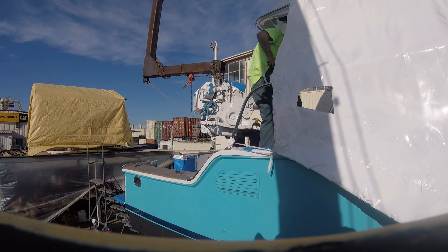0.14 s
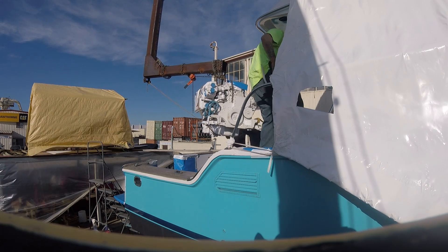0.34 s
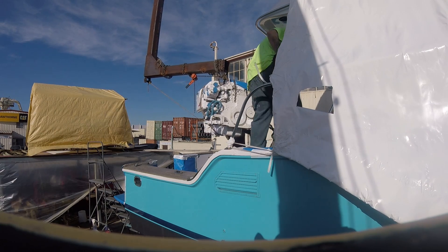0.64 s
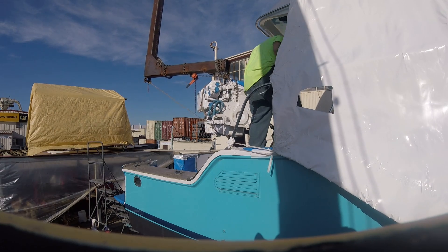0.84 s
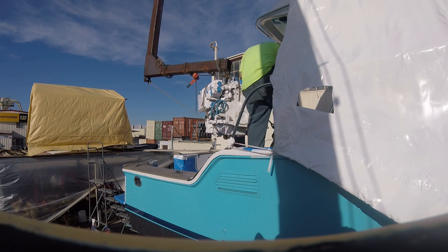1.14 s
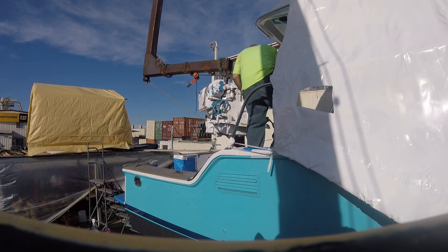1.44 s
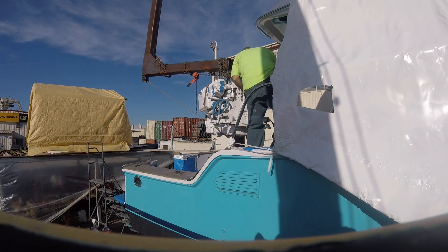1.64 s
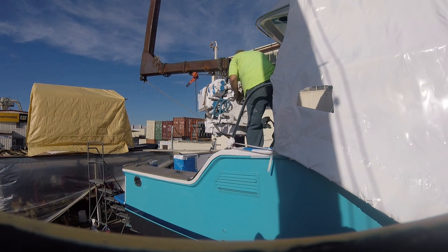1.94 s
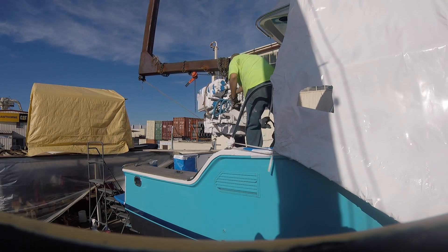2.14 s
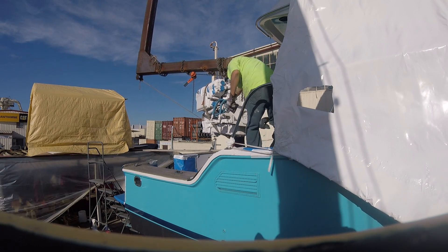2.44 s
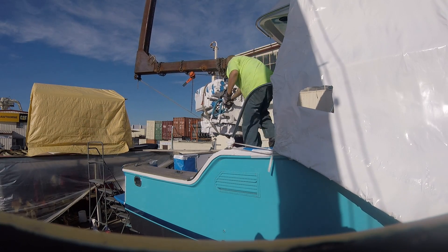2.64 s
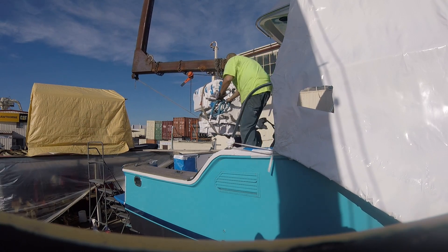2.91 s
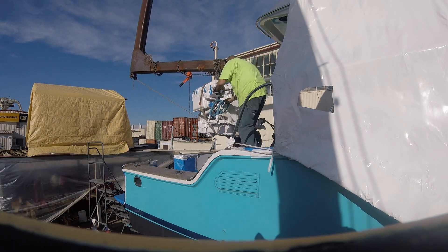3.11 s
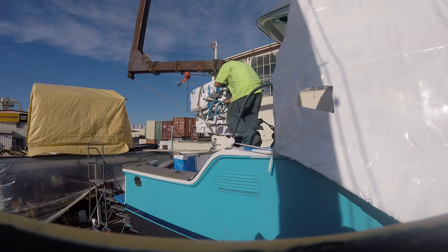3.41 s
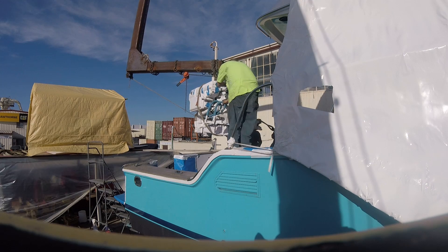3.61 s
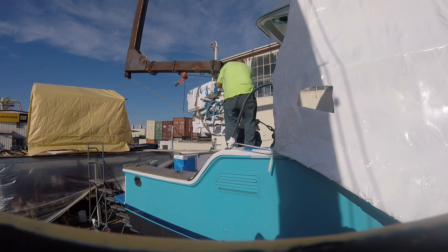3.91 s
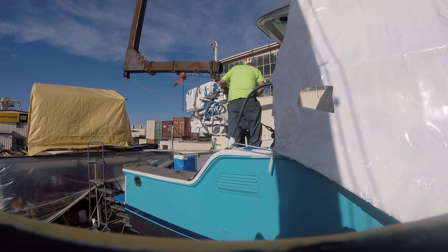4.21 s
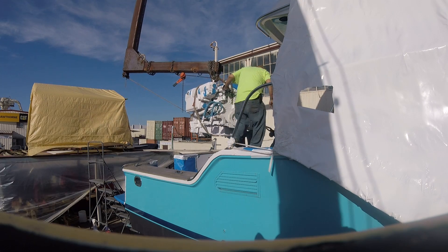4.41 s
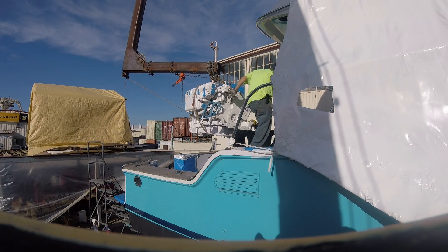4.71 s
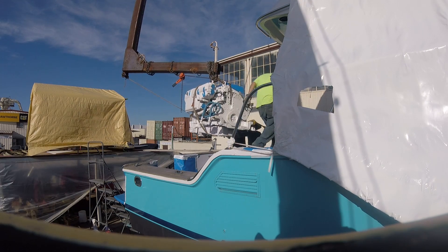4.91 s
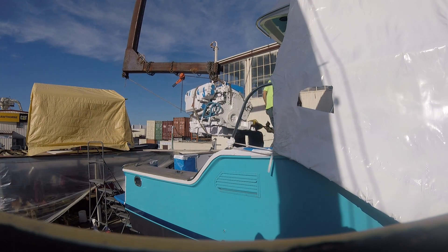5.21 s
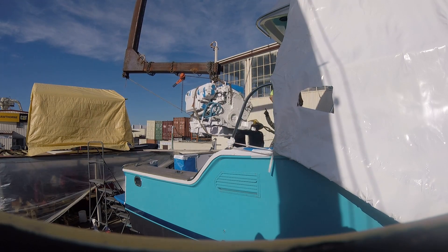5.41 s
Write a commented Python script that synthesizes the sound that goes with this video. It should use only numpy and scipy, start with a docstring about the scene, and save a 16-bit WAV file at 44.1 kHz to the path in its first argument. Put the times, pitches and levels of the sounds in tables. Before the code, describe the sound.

A crane's diesel idles with a low rumble in gusty wind, then a hydraulic hiss and whine joins halfway through.

```python
"""A crane's diesel idles in a boatyard while a marine engine hangs from its hook.
From the start, firing pulses hum in the exhaust over the engine's roar, a fan tone comes and goes,
and gusts buffet the microphone. Early on, chain links tick and a machine hum sags to rest.
Midway a hydraulic valve opens: oil hisses through it and sets the pipework whining.
The whole sound then sinks a little during the strongest gusts, and recovers."""
import sys
import numpy as np
from scipy import signal
from scipy.fft import rfft, irfft
from scipy.io import wavfile
from scipy.ndimage import uniform_filter1d, minimum_filter1d

SR = 44100
rng = np.random.default_rng(int(sys.argv[2]) if len(sys.argv) > 2 else 0)


def log_audio(samples):
    """Write samples as a 16-bit WAV file to the path given in sys.argv[1]."""
    # one column per channel
    frames = np.atleast_2d(samples).T
    # limit to full scale, then quantise
    limited = np.clip(frames, -1, 1)
    pcm = np.round(limited * 32767).astype(np.int16)
    wavfile.write(sys.argv[1], SR, pcm)


N = 244755
TIME = np.arange(N) / SR
FREQS = np.fft.rfftfreq(N, 1 / SR)

# dip and recovery of the whole sound: t/s, gain/dB
OVERALL_DIP = [(3.0, 1), (3.55, -2.5), (3.9, -1), (4.45, -1), (5.2, 1.5)]


def gain_of(db):
    """Amplitude ratio: tenfold for every 20 dB."""
    return 10 ** (np.asarray(db) / 20)


def unit_rms(x):
    """Normalisation to a mean square of one."""
    return x / np.sqrt(np.mean(x ** 2) + 1e-20)


def level_curve(points):
    """Linear interpolation of a level in time."""
    t, db = np.transpose(points)
    return np.interp(TIME, t, db)


def colour(points):
    """Spectral envelope: gain from levels interpolated over log frequency."""
    hz, db = np.transpose(points)
    return gain_of(np.interp(np.log(FREQS + 1), np.log(hz), db))


def passband(half_width_hz, slope, centre_hz=0):
    """Filter gain with power-law skirts; a low-pass when centred on zero."""
    return 1 / (1 + ((FREQS - centre_hz) / half_width_hz) ** slope)


def noise(gain):
    """Spectral shaping of Gaussian noise, at unit rms."""
    real, imag = rng.standard_normal((2, len(FREQS)))
    return unit_rms(irfft((real + 1j * imag) * gain, N))


def drift(hz):
    """Slow random modulation: low-passed noise at unit rms."""
    return noise(passband(hz, 4))


def reflections(reach_s, depth, count=40):
    """Interference of short echoes puts a fixed ripple on a spectrum."""
    taps = np.zeros(N)
    delay, polarity = rng.random((count, 2)).T
    taps[(delay * reach_s * SR).astype(int)] = np.sign(polarity - .5)
    return 1 - depth + depth * unit_rms(abs(rfft(taps)))


def tone(hz, db, waver_hz):
    """Random frequency modulation: a sine wanders a little in pitch."""
    return gain_of(db) * np.sin(2 * np.pi * np.cumsum(hz + waver_hz * drift(10.5)) / SR)


def wind(breeze_db=-28, drop_s=0.069, lump_db=0.56):
    """Turbulent pressure at the microphone: gusts build, drop fast and add to the breeze in power."""
    # turbulence spectrum: f/Hz, relative density/dB
    turbulence = [(15, -23), (35, -1.5), (100, 0), (160, -2), (240, -8.5), (400, -16), (700, -32.5),
                  (1500, -62), (4000, -86.5)]
    # gusts: peak t/s, level/dB, build-up time/s
    gusts = [(.15, -23, 0.42), (1.56, -19.5, .17), (3.379, -12, 0.49), (4.22, -12, 0.6),
             (4.68, -17.5, 0.75), (5.42, -18.5, 0.57)]
    power = gain_of(breeze_db) ** 2
    for t, db, build_s in gusts:
        swell = np.exp(np.minimum((TIME - t) / build_s, (t - TIME) / drop_s))
        power += (gain_of(db) * swell) ** 2
    return np.sqrt(power) * gain_of(-lump_db * drift(14)) * noise(colour(turbulence))


def buffets(low_edge_ratio=0.28):
    """Each eddy striking the microphone is a pressure fluctuation: a short swell of low noise."""
    # eddies: t/s, level/dB, half-length/s, upper edge f/Hz
    eddies = [(1.125, -18.5, 0.037, 350), (1.468, -12, 0.02, 80), (1.532, -15.5, 0.011, 257),
              (2.215, -11.5, 0.036, 110), (3.066, -17, 0.055, 268.3), (3.203, -12.5, 0.014, 278),
              (3.253, -11.5, 0.016, 293), (3.416, -7, 0.015, 230), (3.853, -8.5, 0.0096, 382),
              (4.01, -12.5, 0.0066, 684), (4.06, -13.5, 0.024, 334), (4.237, -11.5, 0.018, 210)]
    out = np.zeros(N)
    for t, db, half_s, edge_hz in eddies:
        band = (1 - passband(low_edge_ratio * edge_hz, 3)) * passband(edge_hz, 5)
        swell = np.exp(-((TIME - t) / half_s) ** 2)
        eddy = swell * noise(band)
        out += gain_of(db) * eddy * np.linalg.norm(swell) / np.linalg.norm(eddy)
    return out


def rigging(level_db=-13, ring_s=0.0054):
    """Damped impacts: chain links shift under the load with faint bright ticks."""
    # link impacts: t/s, relative level/dB
    ticks = [(0.506, -33), (0.5462, -34), (0.8244, -37), (0.9037, -34), (1.073, -39)]
    blows = sum(gain_of(db + level_db) * (TIME >= t) * np.exp(-abs(TIME - t) / ring_s)
                for t, db in ticks)
    ring_band = unit_rms(passband(half_width_hz=1300, slope=4, centre_hz=6100))
    return irfft(rfft(blows * rng.standard_normal(N)) * ring_band, N)


def machine_hum(start_hz=297.3, rest_hz=280.6, start_db=-24.5, rest_db=-32.5, settle_s=0.8):
    """Exponential relaxation: a hum sags in pitch and level as it settles."""
    unsettled = np.exp(-TIME / settle_s)
    hz = rest_hz + (start_hz - rest_hz) * unsettled
    db = rest_db + (start_db - rest_db) * unsettled
    return tone(hz, db, waver_hz=1.5)


def cooling_fan(blade_hz=314.6):
    """Periodic blade passage gives a tone of held pitch, whose strength comes and goes."""
    # blade tone: t/s, level/dB
    strength = [(0, -29.5), (.4, -23.5), (1.1, -23), (1.55, -30), (1.74, -20.5), (2.15, -46.5),
                (2.7, -23.5), (3.4, -22), (3.7, -27.5), (4.8, -30.5), (5.25, -24.5), (5.55, -25.5)]
    return tone(blade_hz, level_curve(strength), waver_hz=0.81)


def oil_jet(since_open, jet_db=-32.5, spray_db=-58, spurt_db=5, spurt_s=0.47, rise_s=0.0078):
    """Turbulent jet noise: oil hisses through the valve, with a first spurt of fine spray."""
    # jet spectrum: f/Hz, relative density/dB
    jet_spectrum = [(300, 2), (550, 1.5), (900, 3.5), (1200, -1), (1700, 0.5), (2400, -1.5), (3700, -6.5),
                    (4150, -2.5), (4450, -6.5), (4800, 0), (6300, -2), (7000, -15), (11000, -24.5),
                    (11900, -35), (13300, -30), (15000, -48)]
    steelwork = reflections(reach_s=0.023, depth=0.45)
    jet = gain_of(jet_db) * noise(colour(jet_spectrum) * steelwork)
    spray_band = passband(half_width_hz=2100, slope=10, centre_hz=9000)
    spray = gain_of(spray_db + spurt_db * np.exp(-since_open / spurt_s)) * noise(spray_band * steelwork)
    opening = 1 - np.exp(-since_open / rise_s)
    sputter = gain_of(0.57 * drift(60))
    return (jet + spray) * opening * sputter


def pipework(since_open, build_s=0.032):
    """Resonance: narrow pipe modes, driven by the flow, take a moment to build into a whine."""
    # pipe modes: f/Hz, width/Hz, relative level/dB
    modes = [(1234, 22, .5), (1299, 9, -1), (1407, 12, -.5), (1466, 10, -1), (1506, 15, -5),
             (1543, 9, -4.5), (1597, 15, -8), (1672, 26, -4.5), (1848, 12, -7), (2211, 40, -10.5),
             (2580, 35, -16), (2802, 55, -4.5), (2953, 24, -12), (4658, 30, -19), (5050, 24, -6),
             (5630, 28, -15), (6069, 22, -15), (7550, 40, -26)]
    # whine: t/s, level/dB
    strength = [(2.7, -29.5), (2.95, -31), (3.4, -31), (4.4, -33.5), (4.85, -30.5), (5.55, -33.5)]
    power = sum((gain_of(db) / (1 + 2 * ((FREQS - hz) / width) ** 2)) ** 2 / width
                for hz, width, db in modes)
    build_up = 1 - np.exp(-since_open / build_s)
    return gain_of(level_curve(strength)) * build_up * noise(np.sqrt(power))


def engine_roar(firings, roar_db=-22, air_db=-53, throb=0.11, lope=0.049):
    """Amplitude modulation: the roar swells with each firing and crankshaft turn, over rushing air."""
    # combustion and casing noise: f/Hz, relative density/dB
    casing_spectrum = [(20, -24), (45, -0.5), (85, -1), (160, 1.5), (250, -4), (285, -2.5), (350, -7.5),
                       (390, -14.5), (450, -12), (800, -15), (1100, -20.5), (1500, -20.5), (2100, -29.5),
                       (3750, -39), (4200, -54)]
    # air rushing through the housing: f/Hz, relative density/dB
    air_spectrum = [(2000, -3), (4450, -4), (4750, -0.5), (5700, -0.5), (6350, -0.5), (6900, -11),
                    (8000, -15), (11000, -19.5), (12000, -27), (15000, -25)]
    beat = 1 + throb * np.cos(2 * np.pi * firings) + lope * np.cos(np.pi * firings)
    hulls = reflections(reach_s=0.06, depth=0.47)
    muffled = colour(casing_spectrum) * passband(5500, 6)
    casing = gain_of(roar_db + 0.5 * drift(15)) * noise(muffled * hulls)
    air = gain_of(air_db + 0.67 * drift(20)) * noise(colour(air_spectrum) * hulls)
    return beat * casing + air


def exhaust(firings, level_db=-17, waver_db=0.47, extra_dip=0.46):
    """Harmonic series: periodic firing pulses leave the muffler as a few low, unsteady partials."""
    # engine orders: multiple of the firing rate, relative level/dB
    orders = [(.5, -19), (1, -4.5), (1.5, -18), (2, -2), (2.5, -20.5), (3, -23.5), (8, -36.5)]
    hum = np.zeros(N)
    for order, db in orders:
        amplitude = np.sqrt(2) * gain_of(db + waver_db * drift(2.3))
        hum += amplitude * np.cos(2 * np.pi * (order * firings + rng.random()))
    # the exhaust dips further than the other sources
    return gain_of(level_db + extra_dip * level_curve(OVERALL_DIP)) * hum


def scene(idle_hz=64.07, sag_hz=0.4494, settle_s=0.926, valve_opens_s=2.648):
    """Superposition: all sources add at one microphone and dip together."""
    firing_hz = idle_hz - sag_hz * np.exp(-TIME / settle_s) + 0.1 * drift(2.06)
    firings = np.cumsum(firing_hz) / SR  # phase in firing cycles
    engine = exhaust(firings) + engine_roar(firings) + cooling_fan() + machine_hum()
    since_open = np.maximum(TIME - valve_opens_s, 0)
    mix = engine + wind() + buffets() + oil_jet(since_open) + pipework(since_open) + rigging()
    return (gain_of(level_curve(OVERALL_DIP)) * mix)[None]


def record(dry, ceiling=0.93, cutoff_hz=15100):
    """Peak limiting: a smoothed gain rounds off the strongest buffets, and a low-pass follows."""
    allowed = np.minimum(1, ceiling / (abs(dry) + 1e-9))
    limited = dry * uniform_filter1d(minimum_filter1d(allowed, size=600), size=400)
    lowpass = signal.firwin(511, cutoff_hz, window=("kaiser", 9), fs=SR)
    return signal.oaconvolve(limited, lowpass[None], "same")


dry = scene()
out = record(dry)
log_audio(out)
```